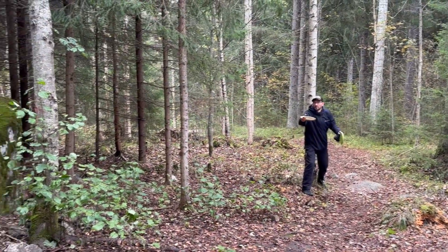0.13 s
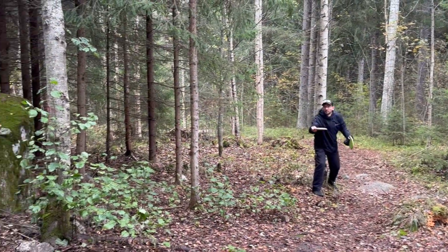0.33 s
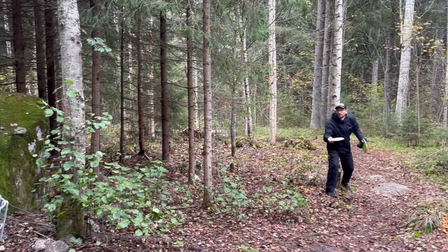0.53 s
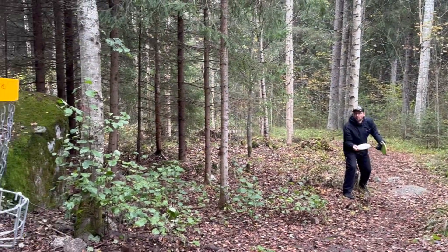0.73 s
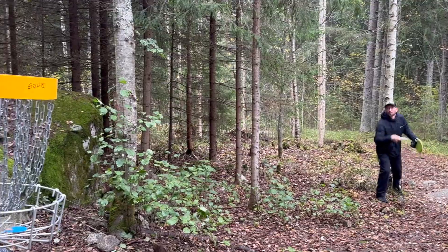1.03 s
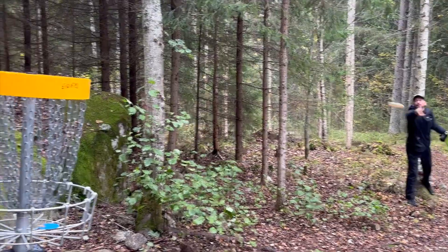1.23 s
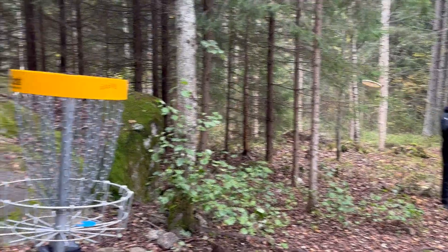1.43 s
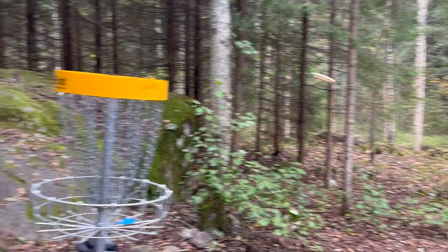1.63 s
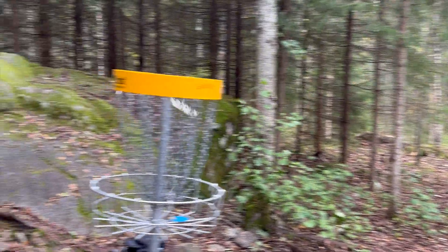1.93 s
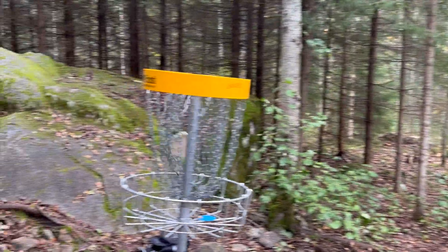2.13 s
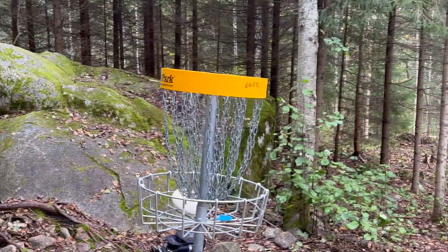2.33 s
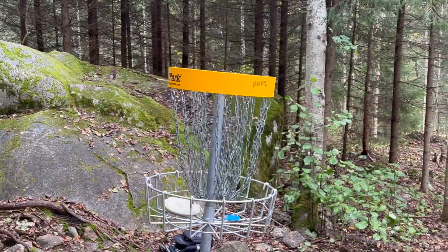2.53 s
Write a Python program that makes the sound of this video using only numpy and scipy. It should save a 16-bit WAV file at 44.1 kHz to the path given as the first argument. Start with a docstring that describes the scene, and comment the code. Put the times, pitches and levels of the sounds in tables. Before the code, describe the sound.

A plastic disc crashes into a metal basket's hanging chains, jingling in a quiet forest.

```python
"""A plastic disc flies into the hanging chains of a metal basket and drops into its tray.
The links clatter, clash and ring in three families of pitches; the disc knocks on pole and tray,
and each knock sets the frame humming. Around it lies a quiet forest, heard alone at first:
soft air, a low wavering hum and small leaf ticks. Two close microphone ports pick it all up."""
import sys
import numpy as np
from scipy import signal
from scipy.fft import rfft, irfft, next_fast_len
from scipy.io import wavfile

SR = 44100
rng = np.random.default_rng(int(sys.argv[2]) if len(sys.argv) > 2 else 0)


def bounce(signal):
    """Save signal as a 16-bit WAV file at the path given by the first command-line argument."""
    frames = np.transpose(np.atleast_2d(signal))
    limited = np.clip(frames, -1, 1)
    pcm = np.round(limited * 32767).astype(np.int16)
    wavfile.write(sys.argv[1], SR, pcm)


N = 119070
HIT_S = 1.9575  # the disc reaches the chains
CONTACTS_PER_S = 2300  # grain density of rustle and clatter

# hard clashes of links: (time [s], crack [dB], low ring [dB], middle ring [dB], high ring [dB])
LINK_CLASHES = [(1.9591, -19.5, -53, -26.5, -30), (2.0064, -17.5, -50, -24, -13.5),
                (2.0641, -19.5, -23.5, -25, -18), (2.083, -19, -28, -20, -20),
                (2.1046, -15, -19, -14.5, -18.5), (2.1173, -15, -27, -21.5, -12),
                (2.155, -42, -34.5, -21, -30), (2.2884, -30, -35, -31, -18), (2.3864, -19.5, -34, -20, -22),
                (2.4908, -33, -38, -31, -26.5), (2.5392, -33, -42, -27, -26.5),
                (2.6124, -46, -50, -42, -27)]


def amp(db):
    """Decibels to gain."""
    return 10 ** (np.asarray(db) / 20)


def rms_one(x):
    """Scale to an RMS of 1."""
    return x / np.sqrt(np.mean(x ** 2) + 1e-20)


def in_time(rows):
    """One envelope for each column after the time."""
    s, *columns = np.transpose(rows)
    return [np.interp(np.arange(N) / SR, s, c) for c in columns]


def at_hz(points, hz):
    """Read a curve along a log frequency axis."""
    point_hz, values = np.transpose(points)
    return np.interp(np.log(hz), np.log(point_hz), values)


def drift(rate_hz):
    """Slow random wander with a spread of 1."""
    r = np.exp(-80 * np.pi * rate_hz / SR)
    slow = signal.lfilter([1], [1, -2 * r, r * r], rng.standard_normal(N // 40 + 2002))[2000:]
    return np.interp(np.arange(N) / 40, np.arange(len(slow)), rms_one(slow))


def ring(feed, hz, t60):
    """One mode: a unit click starts a dying sine of height 1."""
    r, w = amp(-60 / (t60 * SR)), 2 * np.pi * hz / SR
    return signal.lfilter([0, np.sin(w)], [1, -2 * r * np.cos(w), r * r], feed + 1e-18)


def band(x, low_hz, high_hz):
    """Gentle band-pass."""
    sos = signal.butter(2, [low_hz, min(high_hz, .45 * SR)], "band", fs=SR, output="sos")
    return signal.sosfilt(sos, x)


def bands(pair, spectrum, flicker_db):
    """Yield (Hz, slice): flickering third octaves, cut from two noises in turn."""
    edges = 25 * 2 ** (np.arange(29) / 3)
    for k, (low, high) in enumerate(zip(edges, edges[1:])):
        hz = np.sqrt(low * high)
        yield hz, band(pair[k % 2], low, high) * amp(at_hz(spectrum, hz) + flicker_db * drift(15))


def clicks(per_s, spread_db, size=N):
    """Random contacts of uneven size."""
    sizes = amp(spread_db * np.minimum(rng.exponential(1, size), 4)) * np.sign(rng.random(size) - .5)
    return sizes * (rng.random(size) < per_s / SR)


def bursts(times, levels_db, t60):
    """A sharp snap at each time, then noise that dies away."""
    starts = np.zeros(N)
    starts[(np.array(times) * SR).astype(int)] = amp(levels_db)
    decay = signal.lfilter([1], [1, -amp(-60 / (t60 * SR))], starts + 1e-18)
    return decay * rng.standard_normal(N) + 2 * starts


def forest_air():
    """A soft, steady bed of air, widest around 800 Hz."""
    # colour of the air: (frequency [Hz], relative density [dB])
    colour = [(30, 0), (70, 2.5), (140, 3), (250, 0.5), (600, 1), (1050, -8.5), (2500, -11.5),
              (4300, -15.5), (7000, -14.5), (10300, -11), (11500, -21), (16000, -29)]
    # likeness of left and right: (frequency [Hz], likeness [0-1])
    likeness = [(60, 0.8), (300, 0.79), (800, 0), (1400, 0.84), (2000, 1), (12000, 0.91)]
    out = 0
    for hz, (mid, side) in bands(rng.standard_normal((2, 2, N)), colour, flicker_db=.9):
        alike = np.clip(at_hz(likeness, hz), 0, 1)
        out = out + np.sqrt(1 + alike) * mid + np.sqrt(1 - alike) * side * [[1], [-1]]
    return amp(-63) * rms_one(out)


def low_hum(hz=69.9, t60=3.9 / 7.4, octave_db=-16.5, pan_db=.2):
    """Narrow resonant noise: a wavering hum with a faint octave, a touch to the left."""
    # the hum sinks, then returns: (time [s], level [dB])
    fader = [(0.0, -51), (.6, -60), (1.75, -68.5), (1.86, -57.5), (2.7, -54)]
    level_db, = in_time(fader)
    root, octave = (rms_one(ring(rng.standard_normal(N), k * hz, t60)) for k in (1, 2))
    return amp(level_db) * (root + amp(octave_db) * octave) * amp([[pan_db], [-pan_db]])


def ticks_and_rustles(t60=.016, width_hz=1210):
    """Dry leaves and twigs give pitched ticks with a bright edge and many tiny ones; soft rustles pass too,
    among them a brief swish near 1.2 s."""
    # leaf ticks: (time [s], level [dB], pitch [Hz], treble [dB])
    ticks = [(0.0713, -46, 5740, -43), (0.1487, -46.5, 2840, -44), (0.184, -47.5, 3080, -43),
             (0.2605, -45.5, 1610, -48.5), (0.43, -47, 6600, -51), (0.6174, -51, 2610, -48),
             (1.008, -41.5, 2040, -44.5), (1.4001, -38, 2200, -58), (1.512, -37, 2230, -43.5),
             (1.5303, -38.5, 1990, -66), (1.5636, -40.5, 2420, -46.5), (1.7924, -40, 2700, -68),
             (1.8409, -46.5, 2560, -49)]
    # rustles: (centre [s], half length [s], level [dB], low edge [Hz], high edge [Hz])
    rustles = [(0.16, 0.012, -61.5, 700, 2000), (1.18, 0.062, -65.5, 250, 2800),
               (1.56, .12, -67, 1500, 7000)]
    out = amp(-56) * band(clicks(per_s=60, spread_db=3), 4000, 10000)
    for s, db, hz, treble_db in ticks:
        out += band(bursts([s], db, t60), hz - width_hz / 2, hz + width_hz)
        out += band(bursts([s], treble_db, t60 / 2), 4400, 10300)
    for s, half_s, db, low_hz, high_hz in rustles:
        swell = np.exp(-((np.arange(N) / SR - s) / half_s) ** 2)
        out += amp(db) * swell * rms_one(band(clicks(CONTACTS_PER_S, spread_db=5.7), low_hz, high_hz))
    return out


def clatter(colour, level_db):
    """Link on link: a dense hail of small contacts blended with hiss."""
    grains = [rms_one(clicks(CONTACTS_PER_S, spread_db=3.5)) + .87 * rng.standard_normal(N)
              for _ in range(2)]
    return amp(level_db) * rms_one(sum(x for _, x in bands(grains, colour, flicker_db=1)))


def link_ring(modes, rattle_db, clash_db, count=4, clash_t60=.013):
    """Slightly detuned links ring, fed by light touches and by clashes, each a short run of blows."""
    start = int(HIT_S * SR)
    clashes = bursts(np.array(LINK_CLASHES)[:, 0], clash_db, clash_t60)
    runs = abs(clashes[start:]) * 2 / np.sqrt(clash_t60 * SR)
    rings = 0
    for hz, db, t60, spread_hz in modes:
        for detune in np.linspace(-1, 1, count) + rng.normal(0, .34, count):
            touches = clicks(per_s=250, spread_db=2.5, size=N - start)
            feed = [touches, touches * amp(rattle_db[start:]), runs * rng.standard_normal(N - start)]
            rings = rings + ring(amp(db) * np.array(feed), hz + spread_hz * detune, t60)
    steady, rattled, struck = rings  # the steady ring only sets the rattle's scale
    return np.pad(rattled / np.std(steady) + struck, (start, 0))


def chains():
    """The chains catch the disc: clatter, hard cracks and ringing links, silent until the hit."""
    # rattle envelopes: (time [s], clatter [dB], bright clatter [dB], low ring [dB],
    # middle ring [dB], high ring [dB])
    rattle = [(1.958, -26.5, -29, -63, -42, -44), (1.968, -25.5, -23, -42, -30.5, -22.5),
              (2.002, -26.5, -29, -42.5, -29.5, -20), (2.124, -36, -28, -29, -18.5, -19),
              (2.168, -38, -35, -36, -28.5, -18.5), (2.226, -46, -43, -48, -33, -20),
              (2.362, -33, -30.5, -47.5, -50.5, -22.5), (2.4, -32, -33.5, -46, -26.5, -25.5),
              (2.53, -39.5, -40.5, -64, -56, -29.5), (2.542, -34.5, -34.5, -48, -44, -28),
              (2.6, -46.5, -58, -53, -54, -37.5), (2.614, -44.5, -54, -53, -54, -24.5),
              (2.636, -50.5, -54, -52.5, -52, -42), (2.7, -42.5, -46, -64, -53, -35)]
    # body and bright edge of the clatter: (frequency [Hz], relative density [dB])
    body_colour = [(150, -7), (500, -5), (1500, -1.5), (3000, 1), (4000, -4), (6500, -6.5), (9000, -9),
                   (16000, -31)]
    bright_colour = [(4000, -24), (7500, 2.5), (9500, 1.5), (12500, 0), (13500, -2), (16000, -2.5)]
    # three families of link modes: (pitch [Hz], gain [dB], t60 [s], spread between links [Hz])
    low_modes = [(1953, 0, .11, 9), (2021, -4, .26, 4)]
    middle_modes = [(5455, -8, .16, 12), (5535, -2, .21, 8), (5590, -1, .12, 15), (5695, -5, .17, 12),
                    (5850, -11, .15, 20)]
    high_modes = [(10420, -5, .1, 60), (10535, 0, .13, 40), (10640, -1, .12, 50), (10800, -11, .1, 80),
                  (11250, -6, .12, 70), (11450, -13, .1, 40), (12120, -15, .1, 80), (8750, -23, .1, 60)]
    levels = np.where(np.arange(N) >= HIT_S * SR, in_time(rattle), -200)
    body_db, bright_db, low_db, middle_db, high_db = levels
    times, crack_db, low_clash_db, middle_clash_db, high_clash_db = np.transpose(LINK_CLASHES)
    contacts = clatter(body_colour, body_db) + clatter(bright_colour, bright_db)
    cracks = band(bursts(times, crack_db, t60=.098), 1920, 10000)
    return (contacts + cracks
            + link_ring(low_modes, low_db, low_clash_db)
            + link_ring(middle_modes, middle_db, middle_clash_db)
            + link_ring(high_modes, high_db, high_clash_db))


def disc_knocks():
    """Dull plastic knocks on pole and tray, each with a short tone and a blow to the frame."""
    # knocks: (time [s], level [dB], tone [Hz], tone level [dB], blow on the frame [dB])
    knocks = [(1.96, -24.5, 1603, -28, -23.5), (2.006, -28, 72, -36, -28.5),
              (2.129, -26.5, 205.7, -33, -35), (2.16, -55, 48, -34.5, -44), (2.307, -19, 256.4, -36, -19.5),
              (2.399, -24.5, 375, -50, -22.5), (2.449, -28.5, 236, -43.5, -26.5),
              (2.587, -28, 225, -43, -45), (2.628, -26, 358, -44, -45)]
    times, knock_db, tone_hz, tone_db, blow_db = np.transpose(knocks)
    onsets = (times * SR).astype(int)
    out = band(bursts(times, knock_db, t60=.17), 196, 1500)
    for i, hz, db in zip(onsets, tone_hz, tone_db):
        out[i:] += ring(amp(db) * signal.unit_impulse(N - i), hz, t60=.14)
    return out + frame_hum(onsets, blow_db)


def frame_hum(onsets, blow_db):
    """The metal frame rings on, each blow stirring its modes in a slightly different mix."""
    # frame modes: (pitch [Hz], gain [dB], t60 [s])
    modes = [(49.5, -22, 2.3), (106.4, -23, 0.34), (392, -22, 0.33), (478, -17.5, 0.72), (575, -17, 0.11),
             (814, -17, 0.3), (915, -17.5, 0.16), (1292, -20, 0.28), (2520, -20, 0.48), (2912, -20.5, .26),
             (3090, -16, .22)]
    out = 0
    for hz, mode_db, t60 in modes:
        strength = amp(blow_db + mode_db + rng.normal(0, 2, len(onsets)))
        blows = np.zeros(N)
        blows[onsets] = strength * rng.choice([-1, 1], len(onsets))
        out = out + ring(blows, hz, t60)
    return out


def echo(source, delay_s=.01, gain_db=-39):
    """A short, dark echo with its own tail on each side."""
    tails = np.array([band(bursts([delay_s], gain_db, t60=.079), 85, 650)[:SR // 5] for _ in "lr"])
    return signal.fftconvolve(tails, source[None], axes=1)[:, :N]


def scene():
    """The basket and its echo over the forest bed."""
    basket = chains() + disc_knocks()
    return basket + echo(basket) + ticks_and_rustles() + low_hum() + forest_air()


def record(dry, ceiling=.85, low_cut_hz=39, high_cut_hz=15720):
    """The two ports shift in phase against each other; peaks are rounded, rumble and top are cut."""
    # phase between the ports: (frequency [Hz], phase [rad])
    port_phase = [(90, .22), (200, 0), (2400, 0), (3250, .55), (4000, .05), (6750, .05), (7300, 1.4),
                  (7850, np.pi), (8700, np.pi), (9250, 1.7), (10000, .8), (10800, .65), (11400, 0),
                  (13400, 0), (14100, 1.1), (16000, 2.6)]
    size = next_fast_len(N + 2048)
    half_shift = np.exp(.5j * at_hz(port_phase, np.fft.rfftfreq(size, 1 / SR) + 1))
    ports = irfft(rfft(dry, size) * np.array([half_shift, half_shift.conj()]), size)[:, :N]
    rounded = ceiling * np.tanh(ports / ceiling)
    low_cut = signal.butter(2, low_cut_hz, "high", fs=SR, output="sos")
    high_cut = signal.ellip(12, .5, 80, high_cut_hz, fs=SR, output="sos")
    return signal.sosfilt(high_cut, signal.sosfilt(low_cut, rounded))


dry = scene()
out = record(dry)
bounce(out)
```